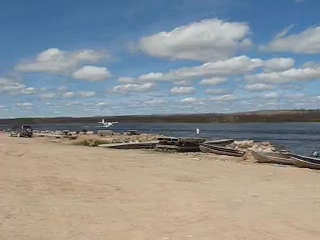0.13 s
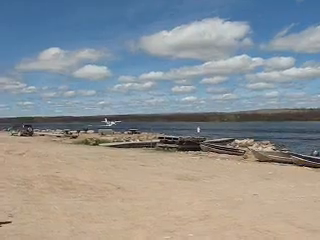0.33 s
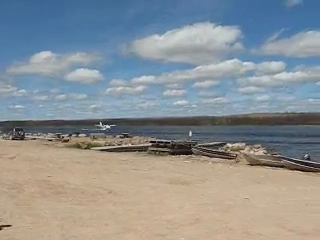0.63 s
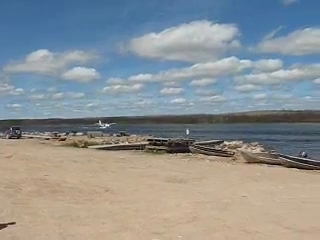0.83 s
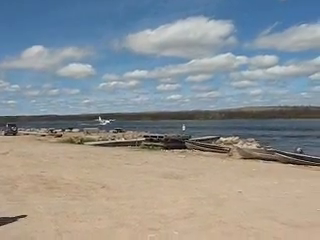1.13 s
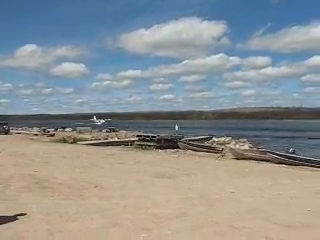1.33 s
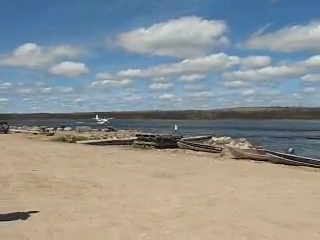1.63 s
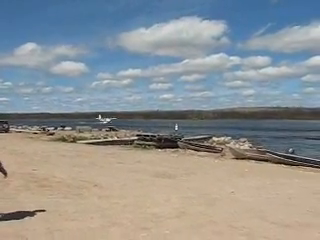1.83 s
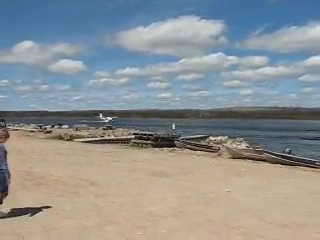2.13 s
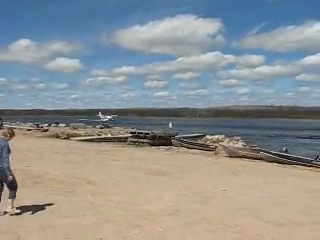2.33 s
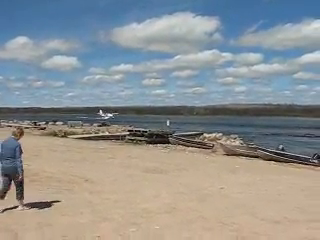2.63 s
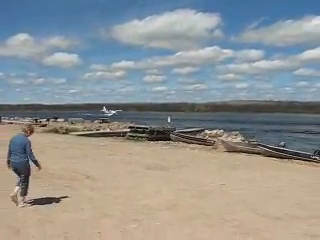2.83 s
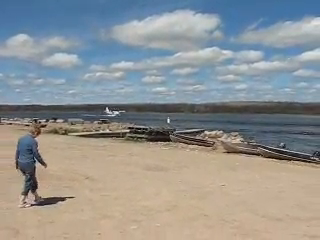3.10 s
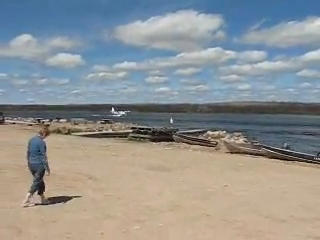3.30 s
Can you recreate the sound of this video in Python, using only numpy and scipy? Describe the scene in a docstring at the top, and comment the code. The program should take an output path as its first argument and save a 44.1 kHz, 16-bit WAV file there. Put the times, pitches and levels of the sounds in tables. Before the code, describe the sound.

After about 0.16 seconds of silence, a far seaplane's broad turbine roar enters, with low hum and two wavering whines. Wind rumbles and thumps unevenly in left and right throughout. Faint hoarse bird calls come left at 0.3, 0.7 and 1.1; small camera ticks at 0.65 and 0.95 over faint motor tones. Hollow knocks sound right around 1.5-1.8. The roar surges from 1.7, dips near 2.5, and ends strongest after 3.2, over faint water wash.

```python
"""Distant seaplane in the wind

A turbine seaplane idles far off: a broad roar of shaped noise that swells, two wavering whines and a low hum.
Wind rumbles and thumps separately in two microphone ports; the camera's motor sings faintly and ticks.
A far bird calls three times on the left, something hollow knocks on the right, and water and far wind wash.
The sound starts after a short silence.
"""
import sys
import numpy as np
from scipy import signal
from scipy.io import wavfile
from scipy.ndimage import uniform_filter1d

SR = 44100
rng = np.random.default_rng(int(sys.argv[2]) if len(sys.argv) > 2 else 0)


def digitize_waveform(pressure):
    """Quantize a signal to 16-bit integers and store it at the path in sys.argv[1].

    Rows of a 2-D input are taken as channels; values are limited to [-1, 1].
    """
    field = np.atleast_2d(pressure).T
    bounded = np.clip(field, -1, 1)
    quanta = np.round(bounded * 32767).astype(np.int16)
    wavfile.write(sys.argv[1], SR, quanta)


N = 152586  # length in samples

# Jet roar over time: time_s, level_db, low_extra_db, high_extra_db (the extras add to fixed boosts)
ROAR_LEVELS = [(0.17, -35, 6, -6), (0.35, -29.5, -0.5, -4), (0.46, -30, 1, -4), (0.81, -24, -13, -9),
               (1.14, -29.5, -5, -7.5), (1.28, -25.5, -9, -5.5), (1.37, -32, 3, -3),
               (1.63, -24.5, -9.5, -9.5), (1.71, -22, -19, -14), (1.76, -15.5, -26, -12.5),
               (1.84, -16.5, -22.5, -15), (1.96, -18, -13, -14), (2.05, -21.5, -13, -12),
               (2.09, -19.5, -27, -16.5), (2.17, -23.5, -9.5, -9), (2.3, -16, -22, -17),
               (2.35, -22, -14, -14), (2.46, -30.5, -1, -5), (2.61, -21.5, -20, -9.5),
               (2.71, -24, -12, -9.5), (2.78, -23, -17, -11.5), (3.05, -24, -5, -7), (3.11, -21.5, -7, -8),
               (3.2, -26.5, 3, -2), (3.24, -17.5, -8.5, -13), (3.33, -16, -6, -14.5),
               (3.46, -15.5, -12.5, -11.5)]
# Colour of the roar, before its loudness is evened: pitch_hz, density_db (per Hz)
ROAR_COLOUR = [(300, -31.5), (500, -20), (700, -12), (950, -10), (1220, -22.5), (1350, -10.5), (1540, -9),
               (2120, -7), (2540, -7.5), (3050, -10.5), (3800, -14), (4670, -12.5), (5820, -19),
               (6790, -13), (7440, -21.5), (8360, -20), (8800, -40.5), (11400, -73)]
# Stereo width of the roar and wash, before narrowing: pitch_hz, side_over_mid_db
STEREO_WIDTH = [(500, -15), (1000, -12.5), (1500, -4), (2400, -4.5), (2800, -40.5), (4000, -57.5),
                (8000, -27.5)]
# Change of that stereo width over time: time_s, side_change_db
WIDTH_CHANGE = [(.17, 1), (1.4, -0.5), (1.7, -15), (2.6, -16.5), (3.46, -16.5)]
# Compressor whines: time_s, upper_pitch_hz, upper_level_db, lower_pitch_hz, lower_level_db
WHINE_PATHS = [(.17, 2548, -44, 1545, -48), (.6, 2560, -40, 1550, -44), (1.0, 2605, -40, 1600, -40),
               (1.4, 2625, -41, 1600, -42), (1.8, 2625, -35, 1600, -37), (2.1, 2620, -40, 1585, -37),
               (2.25, 2640, -35.5, 1572, -36), (2.6, 2590, -34, 1538, -38), (2.9, 2568, -33, 1530, -48),
               (3.17, 2570, -34, 1520, -44), (3.3, 2520, -36, 1505, -38), (3.46, 2480, -30, 1500, -38)]
# Low exhaust hum: time_s, level_db
HUM_LEVELS = [(.17, -25), (.8, -30), (1.4, -27.5), (2.0, -27), (2.3, -36), (3.46, -28.5)]
# Wind over time: time_s, level_db, left_minus_right_db (weighted per port in the rumble),
# deep_extra_db, bright_extra_db (the extras add to fixed boosts)
WIND_LEVELS = [(.17,-20.5,-2.5,-5,-10), (.35,-15,.5,-9,-15), (.42,-20,5,-9,-14), (.59,-19,1,-8,-13),
               (.76,-14,-4,-11,-15), (.83,-17.5,0,-7,-10), (.98,-17,-3.5,-6,-10), (1.02,-16.5,5,-4,-9),
               (1.06,-14,-4,-8,-12), (1.1,-18,9,-6,-13), (1.13,-21,2,-4,-12), (1.28,-22,0,-5,-9),
               (1.31,-14,1,-13,-12), (1.37,-16,-2.5,-8,-10), (1.52,-15,6,-12,-14), (1.56,-17.5,4,-5,-12),
               (1.67,-14,-2,-10,-15), (1.77,-20,5,-10,-11), (1.87,-19,-5,-15,-15), (1.98,-18,3,-8,-11),
               (2.06,-16,-10,-6,-8), (2.1,-20,-11,-12,-16), (2.14,-17,-9,-9,-9), (2.3,-20,-3,-4,-14),
               (2.345,-19,-8,-7,-9), (2.375,-16,-14,-9,-2), (2.4,-24,-4,-10,-8), (2.54,-18,-10,-12,-9),
               (2.58,-26,0,-6,-11), (2.62,-17,-9,-15,-15), (2.7,-14.5,-12,-14,-7), (2.78,-18,-7,-12,-11),
               (2.85,-22,-2,-11,-14), (2.91,-16,-3,-11,-14), (2.98,-19,-1,-12,-14), (3.03,-17,-7,-13,-15),
               (3.12,-22,-2,-14,-16), (3.25,-23,0,-8,-14), (3.29,-19,-5,-14,-15), (3.35,-22,-2,-7,-13),
               (3.46,-22,-3,-8,-15)]
# Colour of the wind in each port, before its loudness is evened: pitch_hz, density_db (per Hz)
LEFT_WIND_COLOUR = [(15, -24), (25, -11), (50, -5.5), (85, 7.5), (160, 1), (280, -11), (400, -13),
                    (700, -22.5), (1200, -26), (2500, -83)]
RIGHT_WIND_COLOUR = [(15, -22.5), (25, -30.5), (50, -17.5), (85, -2), (160, 3.5), (280, -10), (400, -14),
                     (700, -24), (1200, -35), (2500, -80)]
# Strong wind thumps: centre_s, left_level_db, right_level_db
STRONG_THUMPS = [(.3961, -11, -30), (.4815, -10, -14), (.8134, -24, -9), (1.0109, -11, -20),
                 (1.0579, -30, -10), (1.0924, -11, -22), (1.3126, -7, -6), (1.3867, -30, -10),
                 (1.646, -28, -9), (2.369, -30, -5), (2.3836, -40, -4), (2.536, -30, -10),
                 (2.6998, -22, -9)]
# Camera motor tones, before their fade: pitch_hz, level_db
MOTOR_TONES = [(7852, -57), (7882, -56), (8250, -54.5), (8280, -54)]
# Fade of the motor tones: time_s, gain_db
MOTOR_GAIN = [(.17, 1), (1.5, 1), (2.2, -1), (2.6, -9), (3.46, -12)]
# Ticks of the camera housing: start_s, level_db
HOUSING_TICKS = [(0.6418, -19), (0.9352, -24)]
# Hollow knocks: start_s, left_level_db, right_level_db
HOLLOW_KNOCKS = [(1.531, -29, -13), (1.636, -20, -11.5), (1.722, -32, -17), (1.785, -26, -20)]
# Bird calls: start_s, length_s, top_pitch_hz, level_db (on the left)
BIRD_CALLS = [(.30, .10, 1400, -38), (.695, .11, 1460, -36), (1.14, .10, 1470, -37)]
# Colour of the steady wash, before its loudness is evened: pitch_hz, density_db (per Hz)
WASH_COLOUR = [(300, 32), (1300, 8), (3500, 2), (5000, -13), (6000, -25), (7000, -11.5), (8500, 2.5)]
# Faint top hiss over time: time_s, level_db
HISS_LEVELS = [(.17, -65), (.7, -60), (1.6, -61), (1.8, -68), (3.0, -67), (3.46, -58)]
# Colour of the top hiss, before its loudness is evened: pitch_hz, density_db
HISS_COLOUR = [(8800, 0), (10800, -10.5), (11300, 4), (14500, -3), (15600, -5)]


def amp(db):
    """Turns decibels into a plain multiplier."""
    return 10 ** (np.asarray(db) / 20)


def evened(x):
    """Scales a signal to an average (rms) strength of 1."""
    return x / np.sqrt(np.mean(x ** 2) + 1e-20)


def curve(table, column, t=None):
    """Reads a table column along time, with straight lines between the rows."""
    rows = np.array(table, float)
    times = np.arange(N) / SR if t is None else t
    return np.interp(times, rows[:, 0], rows[:, column])


def read(points, hz):
    """Reads a spectrum with pitch spaced as the ear hears it (logarithmic)."""
    f, value = np.transpose(points)
    return np.interp(np.log(hz + 1), np.log(f + 1), value)


def below(hz, edge_hz, power):
    """Weight that is 1 well below the edge and falls away above it."""
    return 1 / (1 + (hz / edge_hz) ** power)


def above(hz, edge_hz, power):
    """Weight that is 1 well above the edge and falls away below it."""
    return 1 / (1 + (edge_hz / (hz + 1)) ** power)


def grid(size):
    """Frame times and bin frequencies for noise that is built in short overlapping frames."""
    times = np.arange(N * 4 // size + 5) * size / 4 / SR
    return times, np.fft.rfftfreq(size, 1 / SR)[:, None]


def drift(shape, frames, bins):
    """Smooth random wandering over time and frequency, with rms 1."""
    z = rng.standard_normal(shape)
    for _ in range(2):
        z = uniform_filter1d(z, size=frames, axis=0)
    return evened(uniform_filter1d(z, size=bins, axis=1)).T


def unit(tone_db):
    """Scales a spectrum in dB so that its noise has rms 1."""
    return tone_db - 10 * np.log10(np.sum(amp(tone_db) ** 2) * 2 / 3)


def noise(field_db, same, size):
    """Noise for two ports, shaped over time and frequency; same is their likeness."""
    a, b, c, d = rng.standard_normal(field_db.shape[:-3:-1] + (4,)).T
    same = np.clip(same, -1, 1)
    left = a + 1j * b
    right = same * left + np.sqrt(1 - same ** 2) * (c + 1j * d)
    z = np.array([left, right]) * amp(field_db)
    return signal.istft(z, nperseg=size, noverlap=size * 3 // 4)[1][:, :N]


def likeness(side_db):
    """Left-right likeness from the side-over-mid level."""
    power = amp(side_db) ** 2
    return (1 - power) / (1 + power)


def spread(t, hz):
    """Left-right likeness of the roar and wash over time and frequency."""
    return likeness(read(STEREO_WIDTH, hz) + curve(WIDTH_CHANGE, column=1, t=t))


def fuzzy(hz, width_hz):
    """A narrow band of noise that follows a pitch curve, with rms 1."""
    r = np.exp(-np.pi * width_hz / SR)
    z = rng.standard_normal(N) + 1j * rng.standard_normal(N)
    for _ in range(2):
        z = signal.lfilter([1 - r], [1, -r], z)
    return evened((z * np.exp(2j * np.pi * np.cumsum(hz) / SR)).real)


def tone(hz):
    """A pure tone whose pitch and level waver slowly on the way through the air."""
    waver_hz, waver_db = 4, 3  # rms
    t, steps = np.arange(N) / SR, np.arange(400) / 100
    pitch = np.interp(t, steps, drift((400, 1), frames=6, bins=1)[0])
    level = np.interp(t, steps, drift((400, 1), frames=6, bins=1)[0])
    phase = 2 * np.pi * np.cumsum(hz + waver_hz * pitch) / SR
    return np.sqrt(2) * amp(waver_db * level) * np.sin(phase)


def roar():
    """Jet roar: broad noise, patchy from the turbulent air it crosses."""
    patchy_db, flutter_db = 1.3, .8  # rms
    t, hz = grid(size=512)
    low = below(hz, 1380, 6) * above(hz, 760, 6)
    high = above(hz, 3410, 6)
    level = curve(ROAR_LEVELS, column=1, t=t)
    level = level + low * (9 + curve(ROAR_LEVELS, column=2, t=t))
    level = level + high * (4.5 + curve(ROAR_LEVELS, column=3, t=t))
    patches = patchy_db * drift((len(t), len(hz)), frames=20, bins=6)
    flutter = flutter_db * drift((len(t), 1), frames=6, bins=1)
    return noise(unit(read(ROAR_COLOUR, hz)) + level + patches + flutter, spread(t, hz), size=512)


def whines():
    """Two compressor whines: wavering tones, the upper with a halo of breathy noise."""
    halo_width_hz, halo_db = 260, 3  # halo level is relative to the tone
    hz = curve(WHINE_PATHS, column=1)
    upper = tone(hz) + amp(halo_db) * fuzzy(hz, halo_width_hz)
    lower = tone(curve(WHINE_PATHS, column=3))
    return upper * amp(curve(WHINE_PATHS, column=2)) + lower * amp(curve(WHINE_PATHS, column=4))


def hum():
    """A low breathy hum of the exhaust: a narrow noise band, alike in both ports."""
    pitch_hz, width_hz = 271.4, 86
    return fuzzy(np.full(N, pitch_hz), width_hz) * amp(curve(HUM_LEVELS, column=1))


def wind():
    """Wind buffets each port as lumpy noise whose deep and bright ends come and go."""
    gust_db, patchy_db = .5, .5  # rms
    t, hz = grid(size=1024)
    deep, bright = below(hz, 82, 4), above(hz, 336, 4)
    colour = deep * (8.5 + curve(WIND_LEVELS, column=3, t=t))
    colour = colour + bright * (15 + curve(WIND_LEVELS, column=4, t=t))
    fields = []
    for weight, shape in ((0.97, LEFT_WIND_COLOUR), (-0.16, RIGHT_WIND_COLOUR)):
        level = curve(WIND_LEVELS, column=1, t=t) + weight * curve(WIND_LEVELS, column=2, t=t) / 2
        gust = gust_db * drift((len(t), 1), frames=3, bins=1)
        patches = patchy_db * drift((len(t), len(hz)), frames=6, bins=3)
        fields.append(unit(read(shape, hz)) + colour + level + gust + patches)
    return noise(np.array(fields), same=.15, size=1024)


def pops():
    """Eddies thump the ports with a short push and pull, more strongly in gusts."""
    per_second, spread_db, width_s = 7, 1.5, .0009  # rate is for each port
    hit = rng.random((2, N)) < per_second / SR
    size = rng.exponential(1, (2, N))
    sign = rng.choice([-1., 1.], (2, N))
    side = np.array([[1], [-1]])
    gust = curve(WIND_LEVELS, column=1) + side * curve(WIND_LEVELS, column=2) / 2
    train = hit * sign * amp(gust + spread_db * np.minimum(size, 3))
    for centre, *db in STRONG_THUMPS:
        i = round(centre * SR)
        train[:, i] = amp(db) * sign[0, i]  # both ports are pushed the same way
    u = np.arange(-300, 300) / SR / width_s
    push_pull = (1 - u ** 2) * np.exp(-u ** 2 / 2)
    return signal.oaconvolve(train, push_pull[None], "same")


def camera():
    """The camera's own sound: fading pure motor tones and short noise ticks of its housing."""
    tick_hz, tick_width_hz, tick_rise_s, tick_decay_s = 7960, 6700, 0.00062, 0.0036
    t = np.arange(N) / SR
    out = np.zeros(N)
    for hz, db in MOTOR_TONES:
        out += np.sqrt(2) * amp(db) * np.sin(2 * np.pi * (hz * t + rng.random()))
    out *= amp(curve(MOTOR_GAIN, column=1))
    u = t[:400]
    envelope = np.exp(-u / tick_decay_s) * np.minimum(u / tick_rise_s, 1)
    for s, db in HOUSING_TICKS:
        tick = envelope * fuzzy(np.full(N, tick_hz), tick_width_hz)[:400]
        out[round(s * SR):][:400] += amp(db) * tick
    return out


def knocks():
    """Something hollow knocks, louder on the right: each hit rings one pitch that dies away."""
    pitch_hz, rise_s, fall_60db_s = 876, 0.0015, 0.042
    train = np.zeros((2, N))
    for s, *db in HOLLOW_KNOCKS:
        train[:, round(s * SR)] = amp(db)
    u = np.arange(4000) / SR
    envelope = np.minimum(u / rise_s, 1) * amp(-60 * u / fall_60db_s)
    ring = envelope * np.sin(2 * np.pi * pitch_hz * u)
    return signal.oaconvolve(train, ring[None])[:, :N]


def bird():
    """Short hoarse calls: a tone plus narrow noise, with a pitch that arches up and down."""
    arch_depth, width_hz, right_db = .13, 45, -7  # depth is a share of the top pitch
    t, out = np.arange(N) / SR, np.zeros(N)
    for start, length, top_hz, db in BIRD_CALLS:
        arch = np.sin(np.pi * np.clip((t - start) / length, 0, 1) ** .8)
        hz = top_hz * (1 - arch_depth * (1 - arch))
        voice = np.sin(2 * np.pi * np.cumsum(hz) / SR) + fuzzy(hz, width_hz)
        out += amp(db) * np.minimum(3 * abs(arch), 1) * voice
    return out * amp([[0], [right_db]])


def shore():
    """Even wash of water and far wind: steady shaped noise."""
    level_db = -38.5
    t, hz = grid(size=512)
    field = unit(read(WASH_COLOUR, hz)) + level_db + 0 * t  # 0 * t repeats it for every frame
    return noise(field, spread(t, hz), size=512)


def hiss():
    """Faint hiss above the microphone's range: treble noise that flickers a little."""
    t, hz = grid(size=512)
    colour = read(HISS_COLOUR, hz) - 80 * (hz < 8800)  # almost nothing below 8800 Hz
    flicker = 2.5 * drift((len(t), len(hz)), frames=8, bins=30)
    return noise(unit(colour) + curve(HISS_LEVELS, column=1, t=t) + flicker, same=.75, size=512)


def scene():
    """Adds all the sources together, ahead of the microphone's limits and hiss."""
    plane = roar() + whines() + hum()
    nearby = wind() + pops() + camera() + knocks()
    return plane + nearby + bird() + shore()


def low_pass(x, hz):
    """Removes what lies above a pitch by averaging nearby samples with set weights."""
    weights = signal.firwin(511, hz, window=("kaiser", 9), fs=SR)
    return signal.oaconvolve(x, weights[None], "same")


def record(dry):
    """Soft overload, microphone range, top hiss, late start and band limit."""
    mic_edge_hz, above_edge_db, top_edge_hz = 8860, -24, 15700
    start_s, rise_s = .163, .003
    soft = dry / (1 + dry ** 4) ** (1 / 4)  # peaks bend smoothly towards 1
    heard = low_pass(soft, mic_edge_hz) + amp(above_edge_db) * soft  # a little passes above the edge
    start = np.clip((np.arange(N) / SR - start_s) / rise_s, 0, 1)
    return low_pass((heard + hiss()) * start, top_edge_hz)


dry = scene()
out = record(dry)
digitize_waveform(out)
```